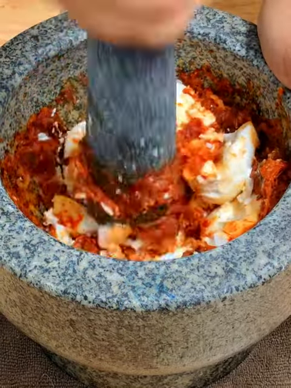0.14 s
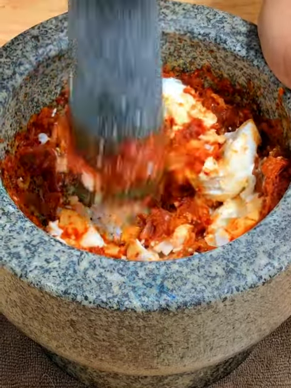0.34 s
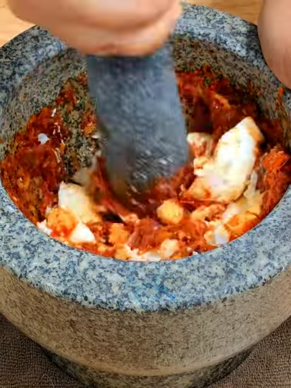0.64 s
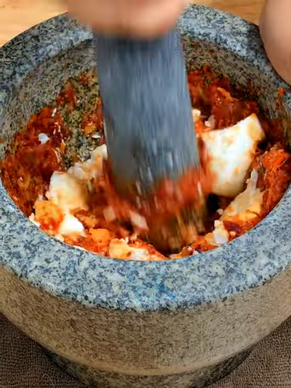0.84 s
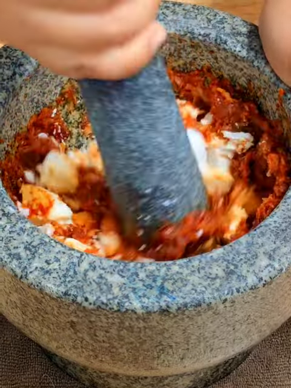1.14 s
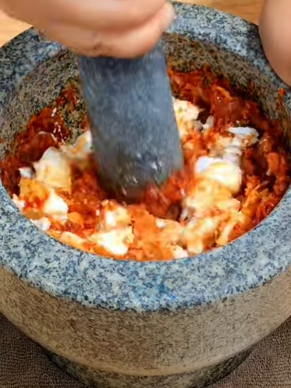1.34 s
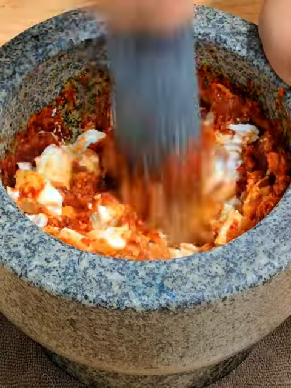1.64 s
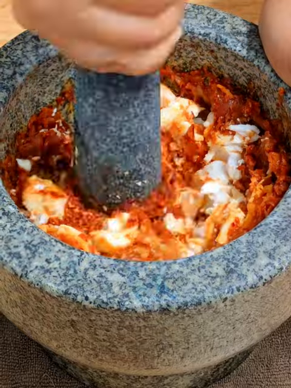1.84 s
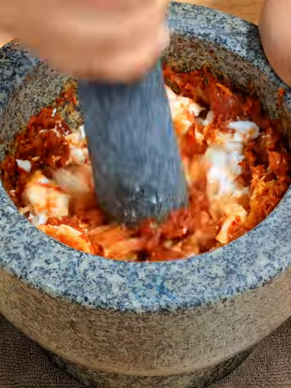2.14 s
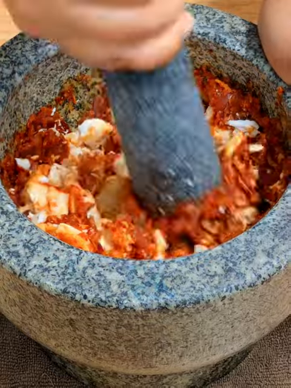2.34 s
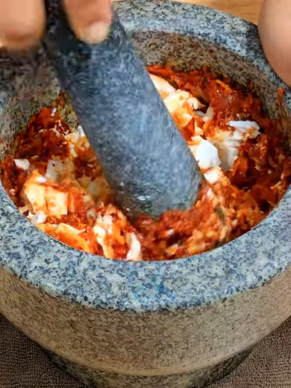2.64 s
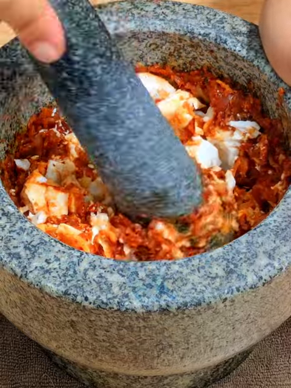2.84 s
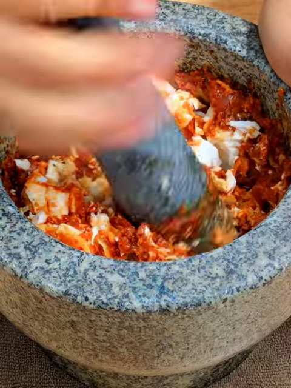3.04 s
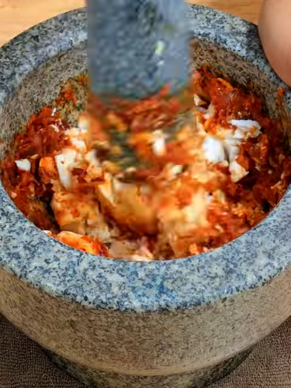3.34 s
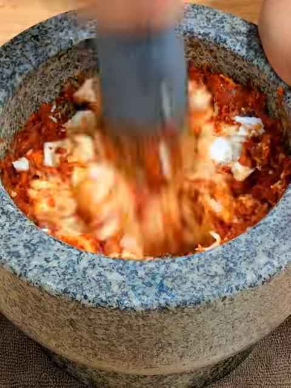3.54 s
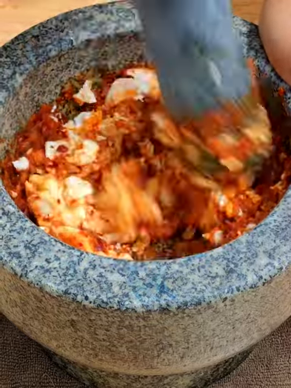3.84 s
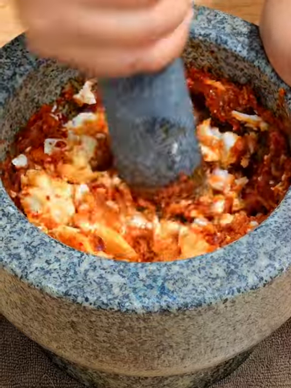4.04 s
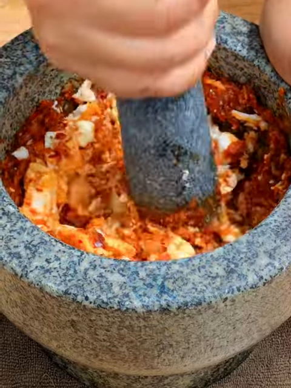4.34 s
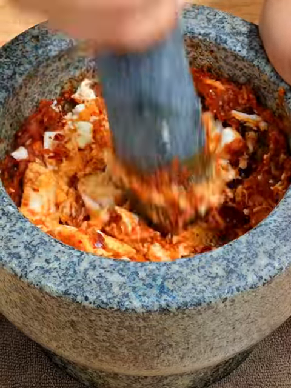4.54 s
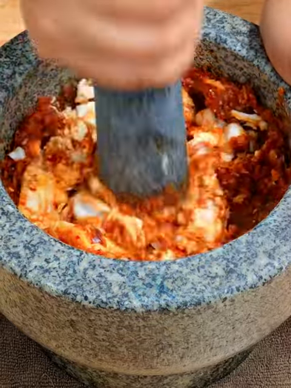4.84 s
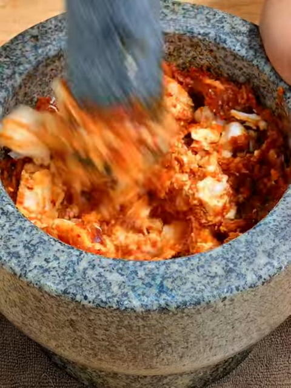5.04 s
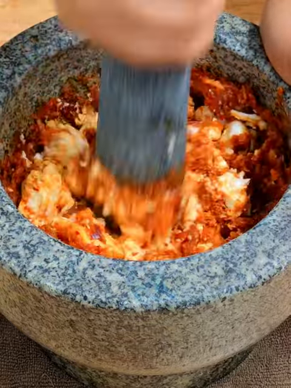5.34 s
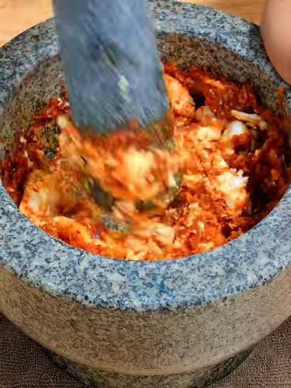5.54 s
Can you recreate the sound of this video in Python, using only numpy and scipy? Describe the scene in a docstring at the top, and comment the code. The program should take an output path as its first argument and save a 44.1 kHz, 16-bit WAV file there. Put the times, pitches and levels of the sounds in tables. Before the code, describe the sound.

Close, dry sound of a stone pestle pounding moist food in a heavy mortar on a wooden table. About six quick strokes a second squelch in and out with low thumps; several early ones crack sharply on bare stone. Midway the pounding breaks off briefly, with one soft dab, then resumes with wetter, duller thuds and a few hard knocks. Small kitchen, faint room noise and hum.

```python
"""A faint hum in steady room noise is heard first, then stone pounding moist food, about six strokes a second.
A stone pestle strikes a stone mortar on a wooden table: force pulses excite damped modes and dense reflections.
Every stroke thumps the table and squelches going in and coming out, as trains of wet snaps.
Some strokes break through and knock on bare stone; air pockets pop, the mortar rubs on the table.
A small kitchen answers the stone and the paste with diffuse echoes."""
import sys
import numpy as np
from scipy import signal
from scipy.fft import rfft, irfft
from scipy.io import wavfile
from scipy.ndimage import uniform_filter1d

SR = 44100
rng = np.random.default_rng(int(sys.argv[2]) if len(sys.argv) > 2 else 0)


def materialize(psi):
    """Save the field psi as 16-bit PCM at rate SR to the path in sys.argv[1].

    A 1-D psi becomes a single channel; in a 2-D psi each row is a channel.
    """
    bounded = np.clip(np.atleast_2d(psi).T, -1, 1)
    quanta = np.round(bounded * 32767).astype(np.int16)
    wavfile.write(sys.argv[1], SR, quanta)


N = 251645  # samples
TIME = np.arange(SR) / SR  # one second, for decays and impulse responses
CLOCK = np.arange(N) / SR  # the whole scene

# All levels are relative: they set balances ahead of further gains and filters.
# steady room noise, spectral density: f/Hz, level/dB
ROOM_NOISE = [(15, -42), (25, -49), (53, -22), (263, -1.5), (326, -0.5), (405, -1.5), (575, -7.5),
              (887, -11), (1290, -14), (1940, -17), (3920, -27.5), (4870, -29), (5730, -32), (10400, -33),
              (16000, -38.5)]
# hum partials: f/Hz, level/dB
HUM_PARTIALS = [(146, -81), (184, -70.5), (382, -72), (497, -68)]
# diffuse echo of the kitchen, by band: f/Hz, level/dB, t60/s
KITCHEN_BANDS = [(300, 27, 0.26), (875, 10.5, 0.092), (1910, -7, 0.25), (3520, -5.5, 0.23),
                 (6350, -5, 0.26), (9800, -5.5, 0.13), (16100, -5.5, 0.22)]
# dense rumble of the wood, by band: f/Hz, level/dB, t60/s
WOOD_BANDS = [(66.4, -27, 0.226), (101, 22, 0.17), (124, 23, 0.13), (166.5, 24, 0.1), (231, -13, 0.44),
              (278, 31, 0.37), (298, 13, 0.37), (376, 13.5, 0.84), (504, 29.5, 0.3), (544, 30, 0.11),
              (655, 23.5, 0.31), (1150, 13, 0.46), (2000, -6, 0.24)]
# lasting resonances of the loaded table and the kitchen around it; close pairs beat: f/Hz, level/dB, t60/s
TABLE_MODES = [(131, -31, .22), (149, -24, .28), (187, -38, .8), (262, -32, .45), (271, -27, .65),
               (288, -36, .55), (362, -29, .35), (380, -33, .55), (428, -31, .35), (492, -27, .35),
               (546, -17.5, .3), (635, -34, .33), (716, -30, .3), (765, -35, .25), (872, -32, .25),
               (945, -35, .22), (1205, -34, .26), (1260, -26, .24), (1303, -28, .24), (1395, -27, .24),
               (1518, -29, .28), (1543, -27, .26), (1700, -30, .28), (1756, -28, .21), (1825, -26, .24),
               (1916, -25, .25), (2037, -27, .25), (2142, -33, .26)]
# rubbing of mortar on table, spectrum: f/Hz, level/dB
RUBBING = [(60, -4), (140, -21.5), (190, 5), (270, -1), (420, -1.5), (560, -25.5), (900, -10), (2000, -35)]
# swelling of the rubbing, spectrum of its fluctuation: f/Hz, level/dB
FITS = [(3, 0), (12, 0), (30, -40), (60, -120)]
# largest air pockets that burst in the paste: t/s, level/dB, f/Hz
LARGE_POCKETS = [(1.065, -44, 7700), (1.208, -42, 4230), (1.38, -54, 4900), (1.508, -40, 2390),
                 (2.2064, -37, 4300), (2.334, -46.5, 1730), (3.118, -41, 5350), (3.632, -38.5, 5170),
                 (3.776, -32, 6400), (4.245, -38, 3900), (4.394, -36, 5500), (4.521, -46, 2970),
                 (5.67, -32, 4630)]
# colour of the squelching: f/Hz, level/dB
WET_COLOUR = [(600, -23), (1000, -8.5), (1700, 6.5), (3000, 3.5), (5000, 3), (8000, 2), (11000, 1),
              (16000, -2)]
# strokes into the paste: t/s, squelch going in level/dB, thud level/dB, time until the lift t/s,
# suck coming out level/dB
PASTE_STROKES = [(.11, -70, -58, 0.059, -72.5), (.282, -69, -48.5, 0.046, -79),
                 (.457, -60, -56, 0.041, -64), (0.628, -63, -51.5, 0.042, -64.5),
                 (0.805, -61, -65, 0.056, -63.5), (.984, -65.5, -48.5, 0.049, -68),
                 (1.157, -68, -52.5, .046, -66.5), (1.321, -63.5, -50.5, .054, -66.5),
                 (1.503, -60.5, -44.5, .04, -86), (1.675, -70, -70, 0.036, -65),
                 (1.84, -64.5, -70, 0.047, -65.5), (1.998, -64.5, -46, .044, -66),
                 (2.167, -62.5, -39, 0.041, -66.5), (2.327, -62, -59, 0.049, -71),
                 (2.488, -68, -62, 0.051, -77), (2.688, -72.5, -57, .045, -77),
                 (3.103, -78, -53, 0.013, -66.5), (3.253, -66.5, -59, 0.033, -65.5),
                 (3.425, -63.5, -35.5, .036, -70), (3.564, -65.5, -42, 0.054, -65),
                 (3.741, -64.5, -45.5, .032, -67), (3.879, -63, -46.5, 0.056, -63.5),
                 (4.039, -62, -38.5, 0.057, -64.5), (4.2, -65, -50, 0.042, -63),
                 (4.352, -65, -43, 0.038, -66), (4.505, -68, -38, 0.028, -64),
                 (4.65, -66.5, -45, 0.05, -64), (4.804, -66, -56, 0.058, -63),
                 (4.968, -66.5, -51.5, 0.036, -64.5), (5.123, -64, -48.5, 0.056, -64.5),
                 (5.287, -68, -76, 0.069, -66), (5.458, -73, -45.5, 0.046, -61.5),
                 (5.631, -64, -44, 0.026, -63)]
# modes of the thick stone bowl, damped by its filling: f/Hz, level/dB, t60/s
BOWL_MODES = [(1418, -1, 0.0035), (1770, 4, 0.0032), (2470, 5.5, 0.0021), (3270, 2, 0.005),
              (3750, 4.5, 0.0028), (5700, 9, 0.0013), (8100, -12, 0.015), (10230, -7, 0.01)]
# bending modes of the pestle, led by close neighbours: multiple of the ring pitch, level/dB, t60/s
PESTLE_MODES = [(1, 4, 0.016), (.952, 7.5, 0.0074), (1.07, 1.5, 0.0037), (2.09, -13, 0.0044),
                (2.56, -19, 0.0054)]
# blows that reach the stone: t/s, force level/dB, contact corner f/Hz (lower where paste pads the blow),
# pitch favoured by the struck spot f/Hz, its boost level/dB, share into the table level/dB,
# rocking level/dB, pestle ring level/dB
STONE_BLOWS = [(.288, -17.5, 4560, 3040, -7, -8, -5, -33), (0.4772, -10, 4300, 2870, 0, -5.5, -9, -28),
               (.827, -9.5, 3900, 1780, 8, -4, 3, -39), (1.5217, -13, 2470, 2080, 9.5, -5.5, 6, -46),
               (1.691, -12, 2620, 1670, 4, -6.5, -13, -60), (1.857, -21.5, 2750, 1380, 9, 0.5, -27, -45),
               (2.533, -37.5, 610, 1500, 0, 6.5, 10, -78), (3.4427, -24.5, 2770, 4940, 8, 5, 2.5, -49),
               (3.596, -30, 1680, 1790, 9, -4.5, 18, -62), (3.7454, -35.5, 2062, 1700, 7.5, -10, 15, -59),
               (4.0555, -24, 1710, 2000, -1.5, -1, -18, -55), (4.835, -31, 660, 800, -1, 6, 1, -75),
               (5.2979, -24, 2770, 2400, 5, -4, 6, -54), (5.471, -15.5, 4850, 2720, 0, -8.5, 10, -23.5)]

SINK_S = 0.019  # from meeting the paste to landing on it
SQUEEZE_S, SUCK_S = 0.037, 0.025  # fall time of the squelch going in and coming out
SOFTNESS_HZ = 359  # contact corner of a blow cushioned by paste
GRIT_DB = -20.5  # tick of stone grains, against the force of the blow
NODE_RATIO = 1.53  # a spot that favours one pitch lies on the node of a mode this much higher
RING_HZ, ROCKING_HZ = 6150, 270  # pestle bending pitch; rocking of the mortar on its base
# a small pocket opens after each lift: middle pitch, its spread, level against the suck, delay
POCKET_HZ, POCKET_OCTAVES, POCKET_DB, POCKET_DELAY_S = 4800, 0.64, 19.5, 0.004
# the jostling of the mortar eases off for a stretch while the strokes go on more sparsely, then resumes
PAUSE_FROM_S, PAUSE_TO_S, SETTLE_S = 2.715, 3.67, 0.27
JOSTLE_DB, PAUSE_DB = -62, -18  # level during work, and its change in the pause


def amp(db):
    """Decibels to amplitude ratio."""
    return 10 ** (np.asarray(db) / 20)


def unit(x):
    """Normalisation to rms 1."""
    return x / np.sqrt(np.mean(x ** 2) + 1e-20)


def add(mix, s, sound):
    """Superposition of a sound on the mix from time s."""
    part = mix[max(round(s * SR), 0):][:len(sound)]
    part += sound[:len(part)]


def shaped(x, hz, gains):
    """Linear filtering by a gain curve on a log-frequency axis."""
    f = np.fft.rfftfreq(len(x), 1 / SR)
    curve = np.interp(np.log(f + 1), np.log(hz), gains)
    return irfft(rfft(x) * curve, len(x))


def coloured(x, spectrum):
    """Linear filtering by a spectrum of f/Hz, level/dB."""
    hz, db = np.transpose(spectrum)
    f = np.fft.rfftfreq(len(x), 1 / SR)
    curve_db = np.interp(np.log(f + 1), np.log(hz + 1), db)
    return irfft(rfft(x) * amp(curve_db), len(x))


def favoured(x, hz, boost_db, q):
    """Resonance: lifts or weakens a single peak of quality factor q."""
    peak = signal.lfilter(*signal.iirpeak(hz, q, fs=SR), x)
    return x + (amp(boost_db) - 1) * peak


def fade(t60):
    """Exponential decay, 60 dB in t60."""
    return np.exp(-np.log(1000) * TIME / t60)


def through(x, response):
    """Convolution of a signal with an impulse response."""
    return signal.fftconvolve(x, response)[:N]


def ringing(modes):
    """Modal superposition: damped cosines whose neighbours start in opposite senses."""
    out = np.zeros(SR)
    for k, (hz, db, t60) in enumerate(modes):
        out += (-1) ** k * amp(db) * fade(t60) * np.cos(2 * np.pi * hz * TIME)
    return out


def diffuse(bands, rise):
    """Diffuse field: dense reflections build up, then decay at each band's own speed."""
    hz, db, t60 = np.transpose(bands)
    noise, out = rng.standard_normal(SR), np.zeros(SR)
    for k, share in enumerate(np.eye(len(hz))):
        envelope = fade(t60[k]) * (1 - np.exp(-TIME / rise))
        out += amp(db[k]) * shaped(noise, hz, share) * envelope / np.linalg.norm(envelope)
    return out


def contact(corner_hz):
    """Contact mechanics: the softer the contact, the longer and duller its force pulse."""
    lowpass = signal.butter(3, min(corner_hz, SR / 3), fs=SR, output="sos")
    return signal.sosfilt(lowpass, signal.unit_impulse(SR // 10))


def background(noise_db=-60):
    """Stationary noise and phase modulation: steady room noise under a faint wavering hum."""
    out = amp(noise_db) * unit(coloured(rng.standard_normal(N), ROOM_NOISE))
    for hz, db in HUM_PARTIALS:
        drift = unit(uniform_filter1d(rng.standard_normal(N), size=SR // 2))  # phase in radians
        out += amp(db) * np.sqrt(2) * np.sin(2 * np.pi * hz * CLOCK + drift)
    return out


def kitchen(x, turns_per_s=0.8):
    """Reverberation: the reflection pattern keeps shifting as hand and arm move over the bowl."""
    angle = 2 * np.pi * turns_per_s * CLOCK
    echo = np.zeros(N)
    for k in range(3):  # three independent patterns share a constant total power
        share = np.sqrt(2 / 3) * np.cos(angle + k * np.pi / 3)
        echo += through(x * share, diffuse(KITCHEN_BANDS, rise=0.00035))
    return echo


def table_response():
    """Structural vibration: lasting modes over the dense rumble of the wood."""
    build_up = 1 - np.exp(-TIME / 0.00083)  # the heavy table is slow to start moving
    return ringing(TABLE_MODES) * build_up + diffuse(WOOD_BANDS, rise=0.0023)


def jostle():
    """Friction: the mortar rocks and rubs on the table in fits, less in the pause."""
    inside_pause = np.minimum(CLOCK - PAUSE_FROM_S, PAUSE_TO_S - CLOCK)
    resting = np.clip(inside_pause / SETTLE_S, 0, 1)
    rubbing = coloured(rng.standard_normal(N), RUBBING)
    fits_db = 5 * np.tanh(unit(coloured(rng.standard_normal(N), FITS)))
    return amp(JOSTLE_DB + PAUSE_DB * resting + fits_db) * rubbing


def pops(cycles=1.36, pop_db=3, tear_db=-17):
    """Bubble resonance: each pocket opens with a snap of a few cycles, then its skin tears."""
    small = []
    for s, _, _, dwell, suck_db in PASTE_STROKES:
        hz = POCKET_HZ * 2 ** (POCKET_OCTAVES * rng.uniform(-1.3, 1))
        small.append((s + dwell + POCKET_DELAY_S, suck_db + POCKET_DB, hz))
    out = np.zeros(N)
    for s, db, hz in LARGE_POCKETS + small:
        turns = hz * TIME[:SR // 50]
        snap = np.exp(-turns / cycles) * np.sin(2 * np.pi * turns)
        tear = fade(0.022) * rng.standard_normal(SR) * (rng.random(SR) < 0.1)  # sparse crackle
        opening = signal.unit_impulse(SR) + amp(tear_db) * tear
        add(out, s, amp(db + pop_db) * through(opening, snap))
    return out


def squeezes():
    """Viscous flow: each stroke squeezes the paste, then tears it on lifting; t/s, level/dB, fall time/s."""
    going_in = [(s, db, SQUEEZE_S) for s, db, _, _, _ in PASTE_STROKES]
    coming_out = [(s + dwell, db, SUCK_S) for s, _, _, dwell, db in PASTE_STROKES]
    return going_in + coming_out


def squelches(grains_per_s=110, spread_db=3, rise=0.003, wet_db=6.5, colour_db=5, cycles=1.77):
    """Poisson trains of wet snaps, mostly faint; each squeeze has its own mix of bubble sizes."""
    pitches = np.linspace(1100, 15500, num=22)  # Hz
    trains = np.zeros((len(pitches), N))
    t = TIME[:SR // 5]
    for s, db, length in squeezes():
        start = round(s * SR)
        envelope = amp(db + wet_db) * (1 - np.exp(-t / rise)) * np.exp(-(t / length) ** 2)
        when, size, sign = rng.random((3, len(pitches), 64))
        gaps = -np.log(1 - when) / grains_per_s * SR  # exponential waiting times, in samples
        at = np.cumsum(gaps, axis=1).astype(int)
        mixture_db = colour_db * rng.standard_normal((len(pitches), 1))
        size_db = spread_db * np.minimum(-np.log(1 - size), 4)
        height = unit(np.sign(sign - 0.5) * amp(size_db + mixture_db))
        height *= np.sqrt(SR / grains_per_s / len(pitches))  # power independent of grain density
        pitch, grain = np.nonzero(at < min(len(t), N - start))
        moment = at[pitch, grain]
        trains[pitch, start + moment] += height[pitch, grain] * envelope[moment]
    out = np.zeros(N)
    for hz, train in zip(pitches, trains):
        turns = hz * TIME[:SR // 200]
        snap = np.exp(-turns / cycles) * np.sin(2 * np.pi * turns)
        out += np.convolve(train, snap / np.linalg.norm(snap))[:N]
    return coloured(out, WET_COLOUR)


def thuds(push_db=19, crush_db=-35):
    """Cushioned impact: the slow push of each stroke, uneven as lumps give way under it."""
    force = np.zeros(N)
    for s, _, db, _, _ in PASTE_STROKES:
        lumps = fade(0.13) * rng.standard_normal(SR)
        push = signal.unit_impulse(SR) + amp(crush_db) * lumps
        add(force, s + SINK_S, amp(db + push_db) * through(push, contact(SOFTNESS_HZ)))
    return force


def knocks(node_db=-9):
    """Hard impact: forces of bare-stone blows on bowl and table, and the pestle's brief ring in the hand."""
    bowl, table, ring = np.zeros((3, N))
    pestle = ringing([(ratio * RING_HZ, level, t60) for ratio, level, t60 in PESTLE_MODES])
    for s, db, corner_hz, spot_hz, spot_db, table_db, rocking_db, ring_db in STONE_BLOWS:
        force = amp(db) * contact(corner_hz)
        placed = favoured(force, spot_hz, spot_db, q=4.8)
        # a mode struck on its node hardly sounds
        add(bowl, s, favoured(placed, NODE_RATIO * spot_hz, node_db, q=5.2))
        # grains of stone touch with a sharp one-sample tick, weaker where padded
        add(bowl, s, amp([db + GRIT_DB]) * min(corner_hz / 3000, 1.5))
        # off-centre blows rock the mortar on its base
        add(table, s, amp(table_db) * favoured(force, ROCKING_HZ, rocking_db, q=4.3))
        add(ring, s, amp(ring_db) * pestle)
    return bowl, table, ring


def scene():
    """Source and response: forces drive stone and table; the kitchen echoes the bright sounds."""
    strike, shove, ring = knocks()
    stone = through(strike, ringing(BOWL_MODES)) + ring
    table = through(shove + thuds() + jostle(), table_response())
    paste = squelches() + pops()
    echo = kitchen(stone + amp(-2.5) * paste)
    return (stone + table + paste + echo + background())[None]


def record(dry, low_cut_hz=78, edge_hz=16100):
    """Band limitation: the microphone's low cut, then a steep upper edge."""
    low_cut = signal.butter(5, low_cut_hz, "highpass", fs=SR, output="sos")
    thinned = signal.sosfilt(low_cut, dry)
    band_limit = signal.firwin(511, edge_hz, window=("kaiser", 9), fs=SR)
    return signal.oaconvolve(thinned, band_limit[None], "same")


dry = scene()
out = record(dry)
materialize(out)
```